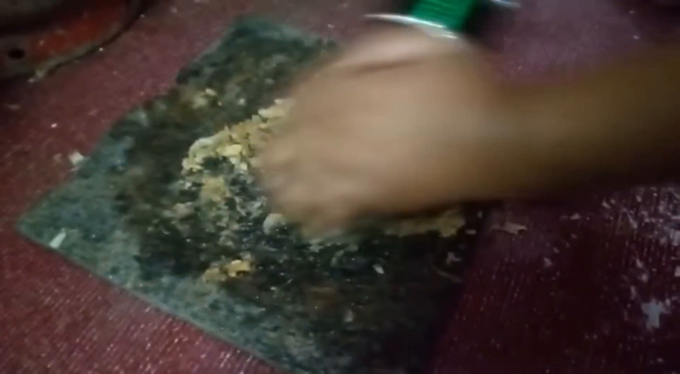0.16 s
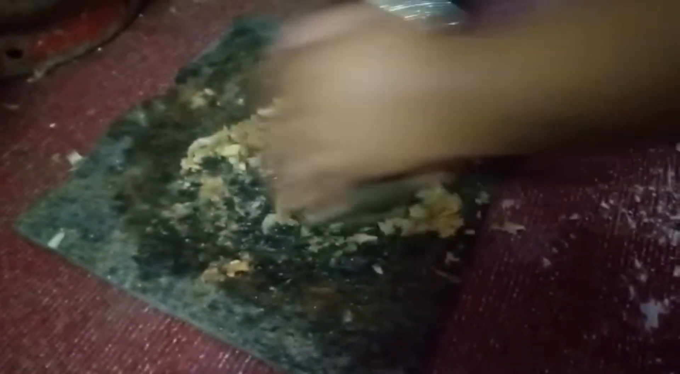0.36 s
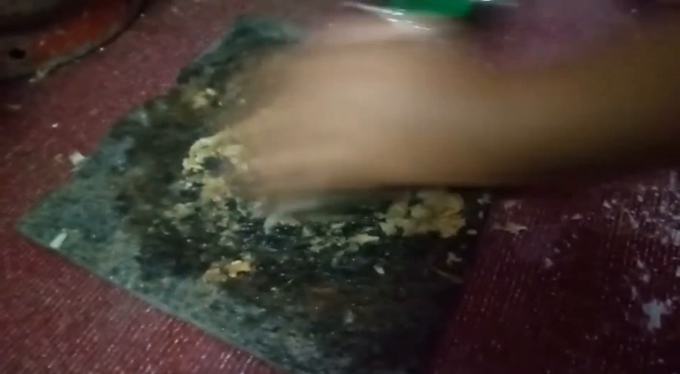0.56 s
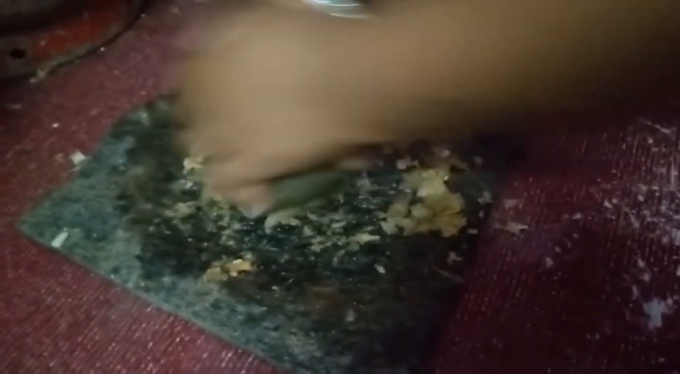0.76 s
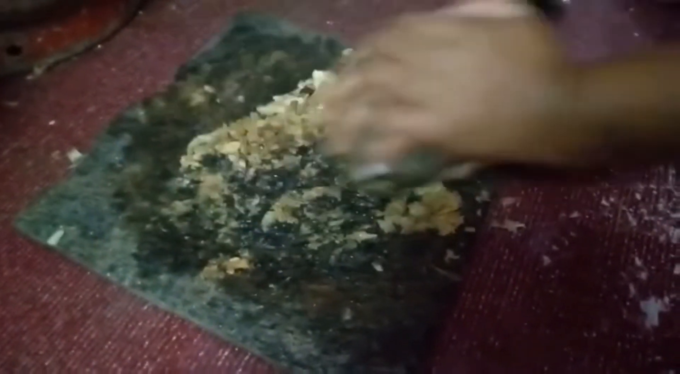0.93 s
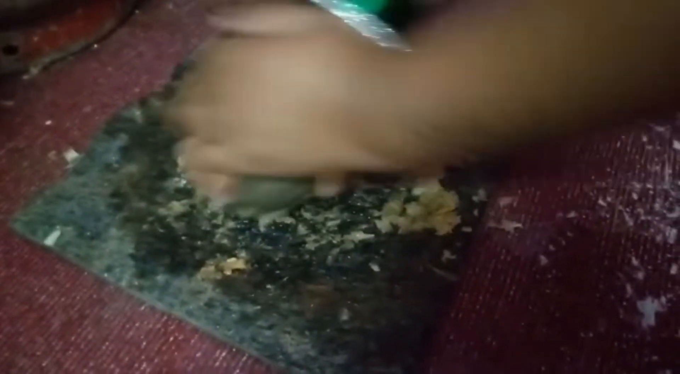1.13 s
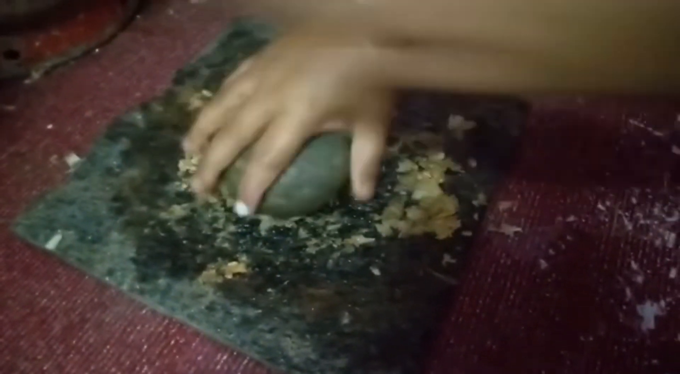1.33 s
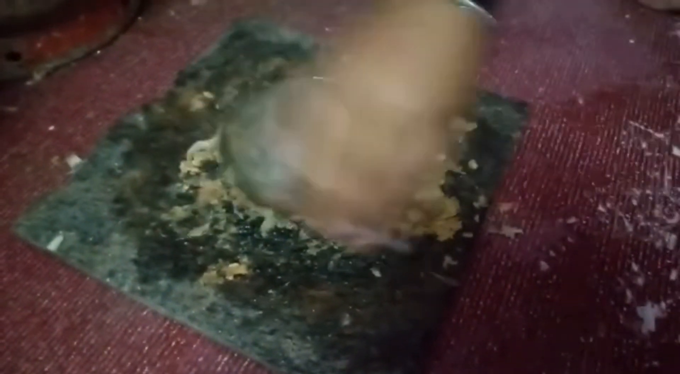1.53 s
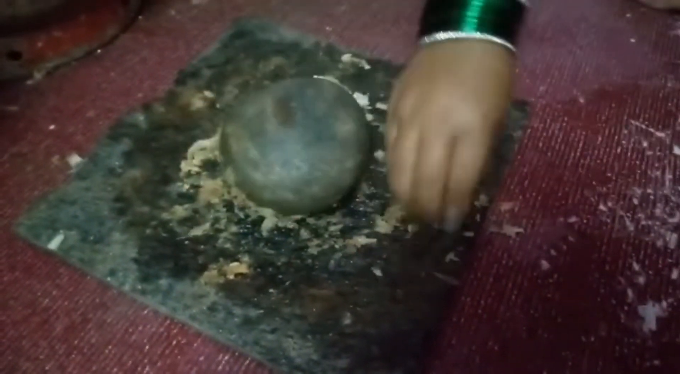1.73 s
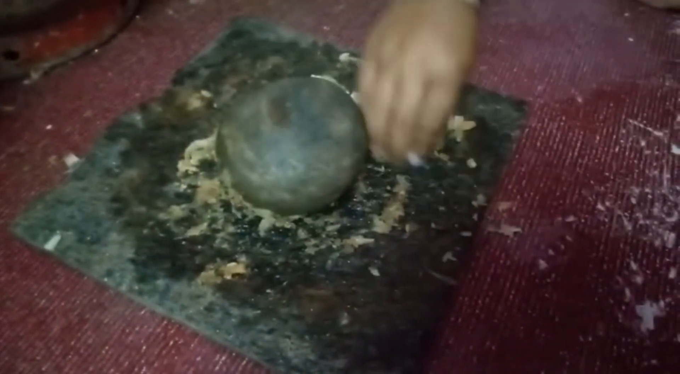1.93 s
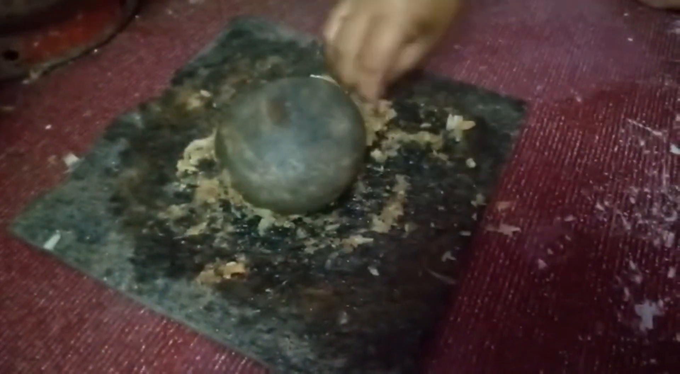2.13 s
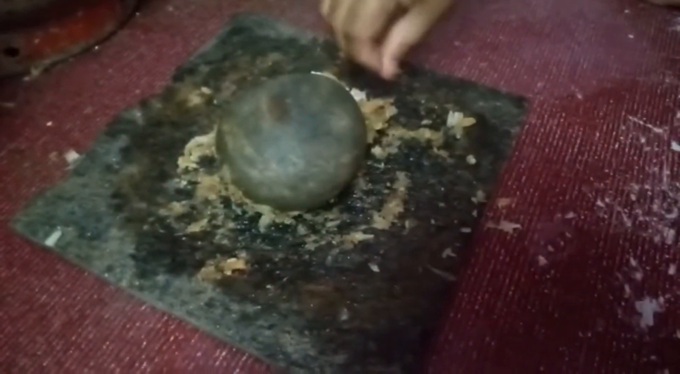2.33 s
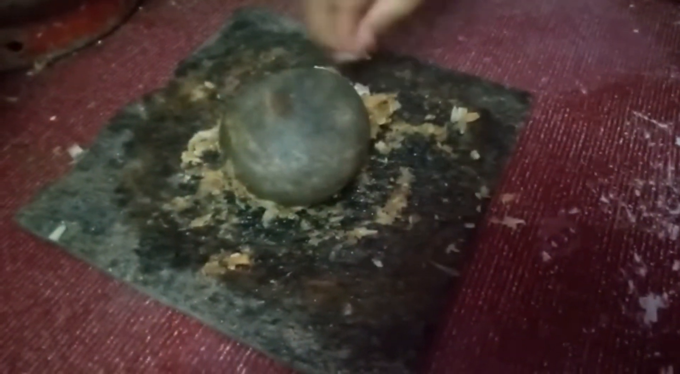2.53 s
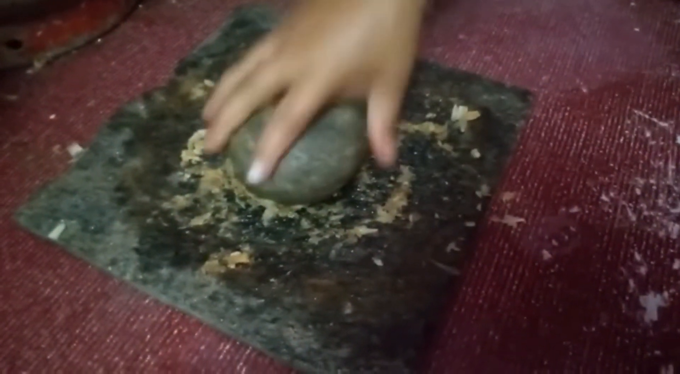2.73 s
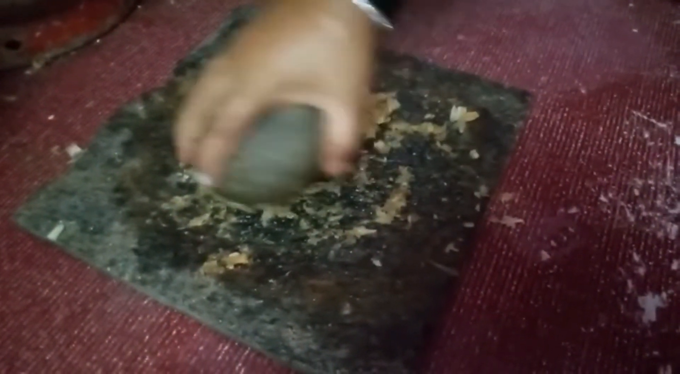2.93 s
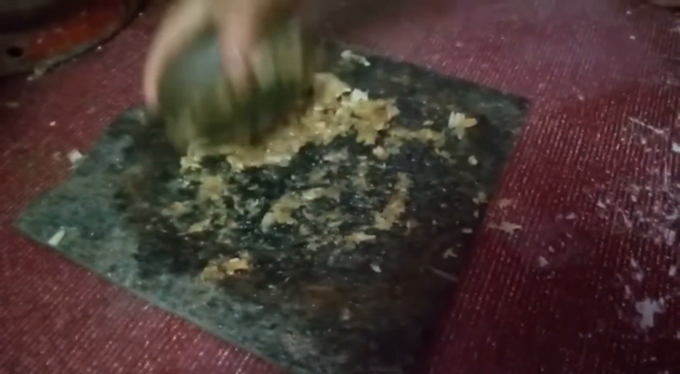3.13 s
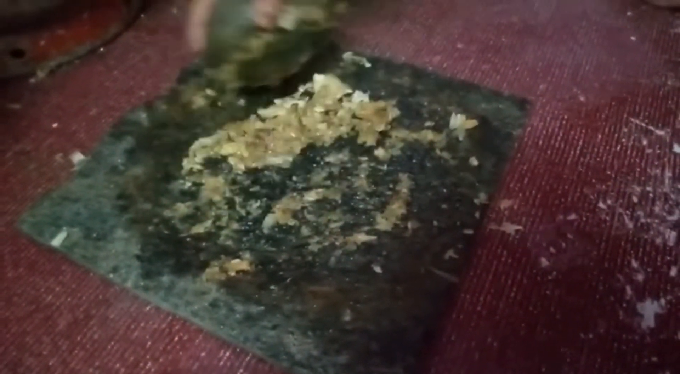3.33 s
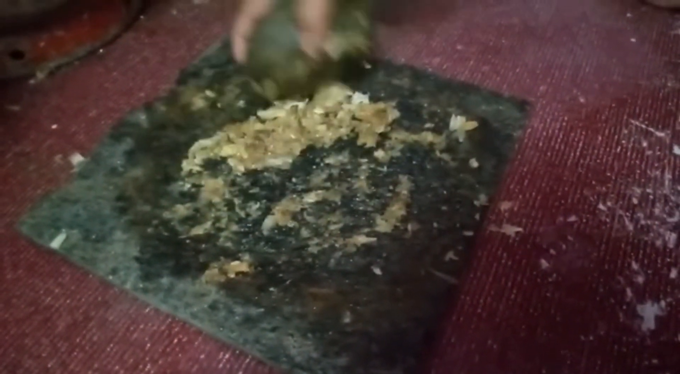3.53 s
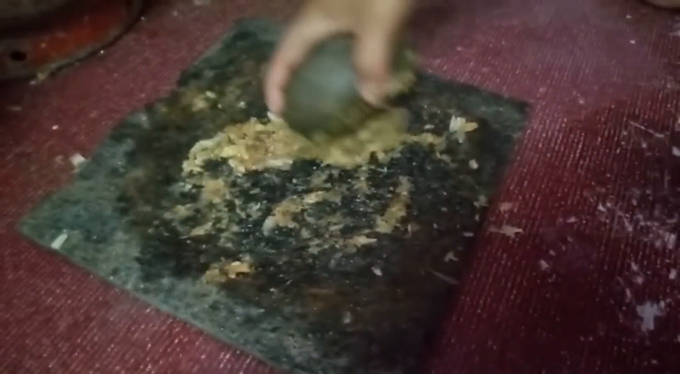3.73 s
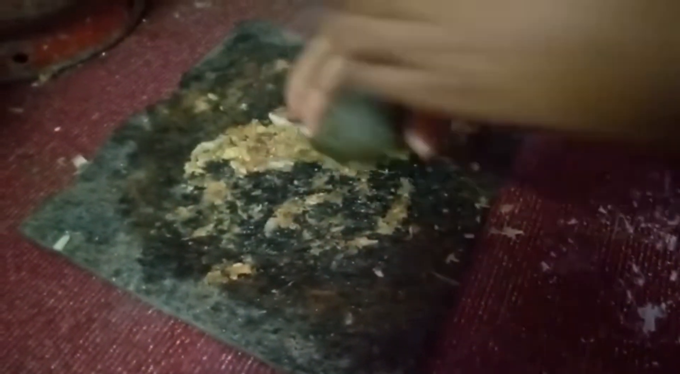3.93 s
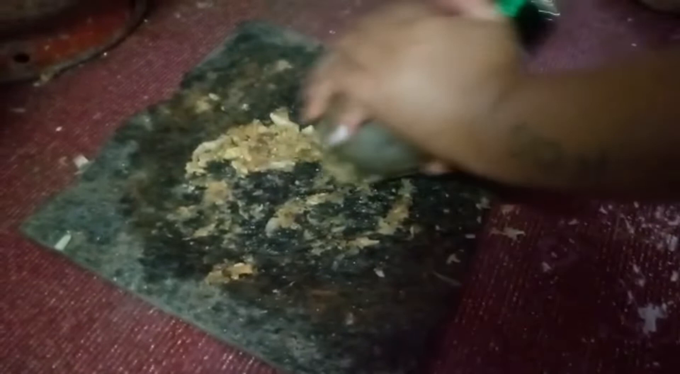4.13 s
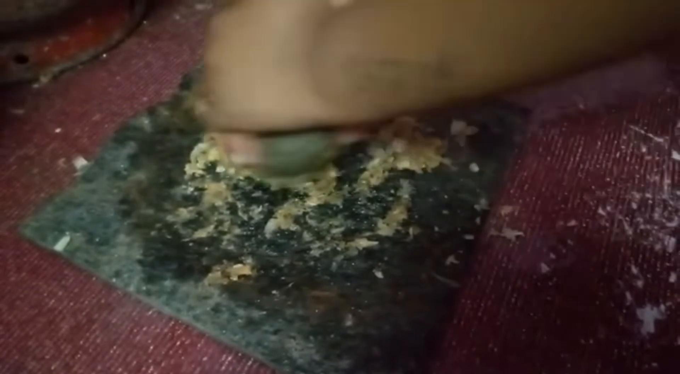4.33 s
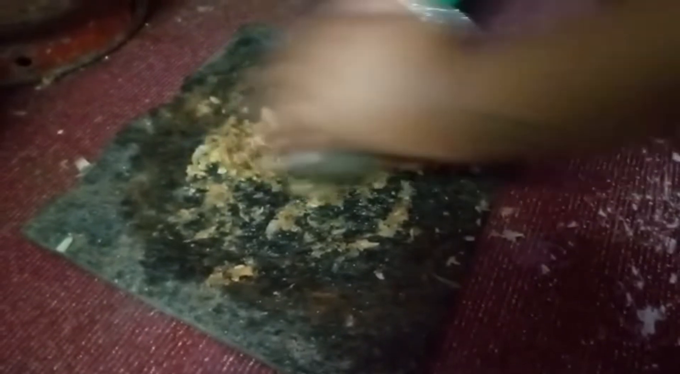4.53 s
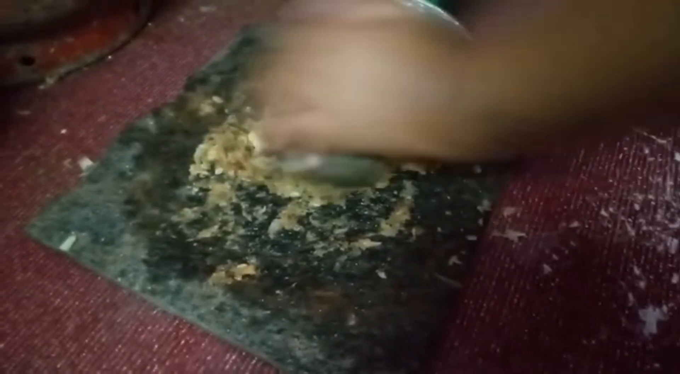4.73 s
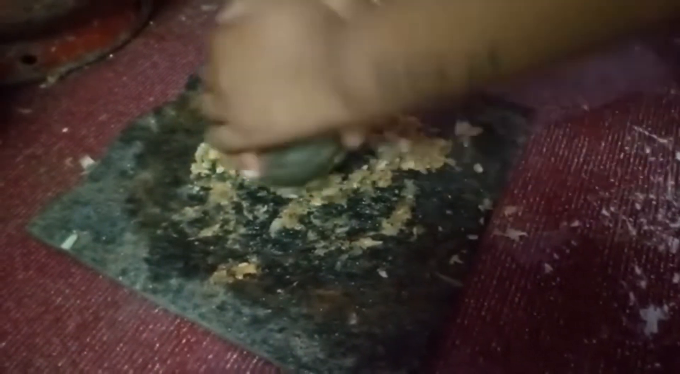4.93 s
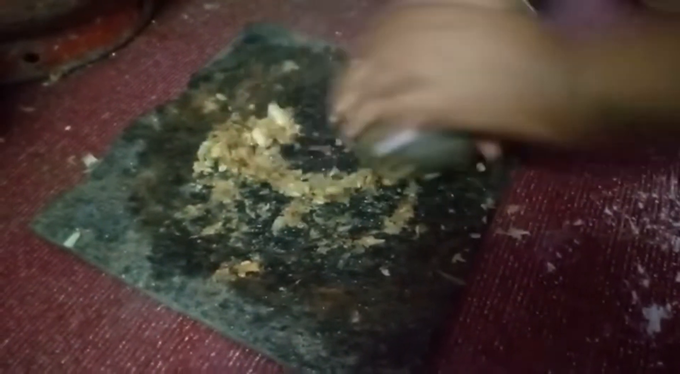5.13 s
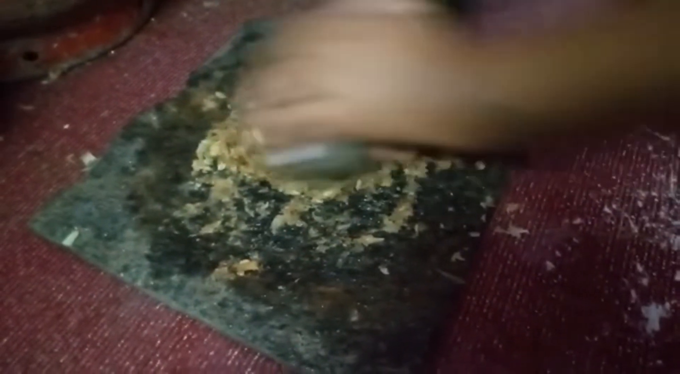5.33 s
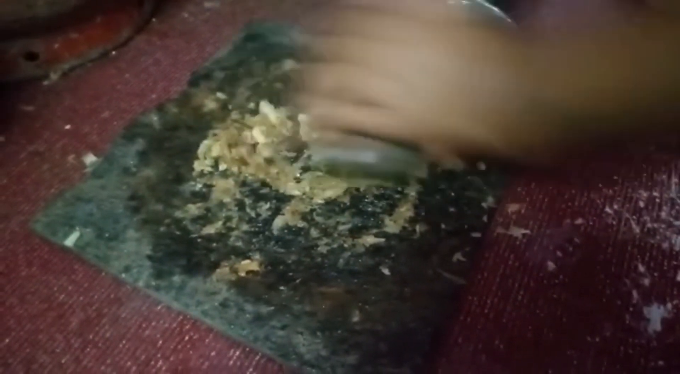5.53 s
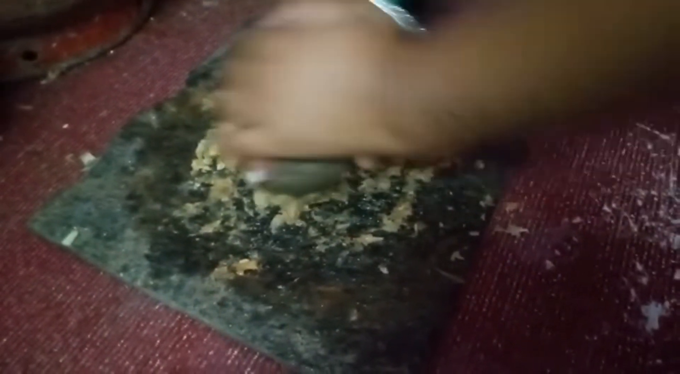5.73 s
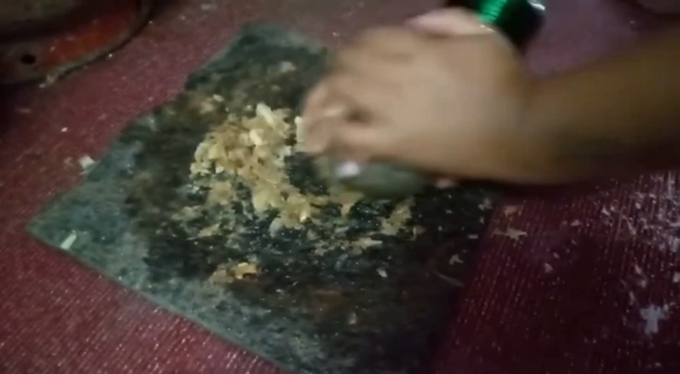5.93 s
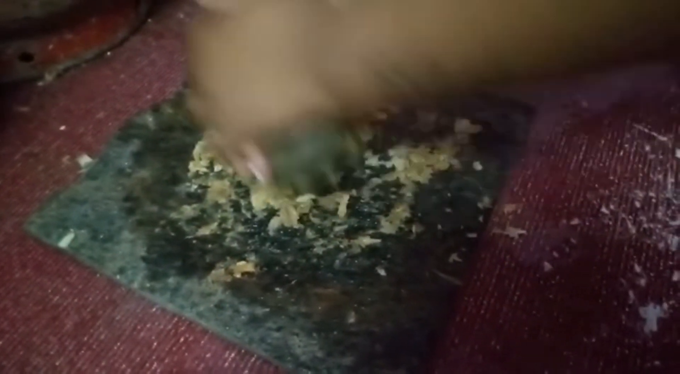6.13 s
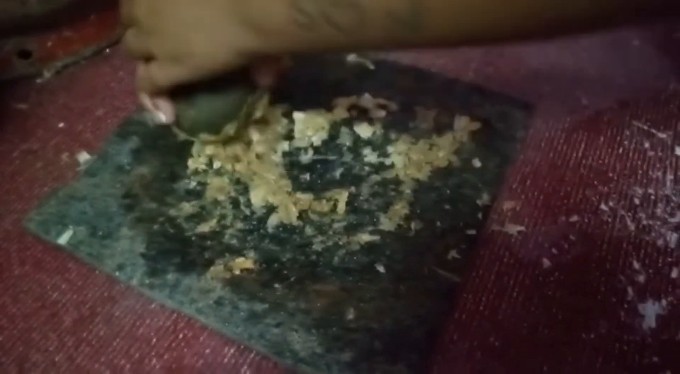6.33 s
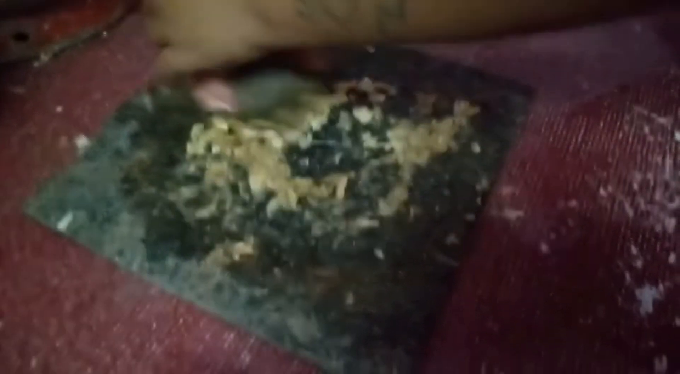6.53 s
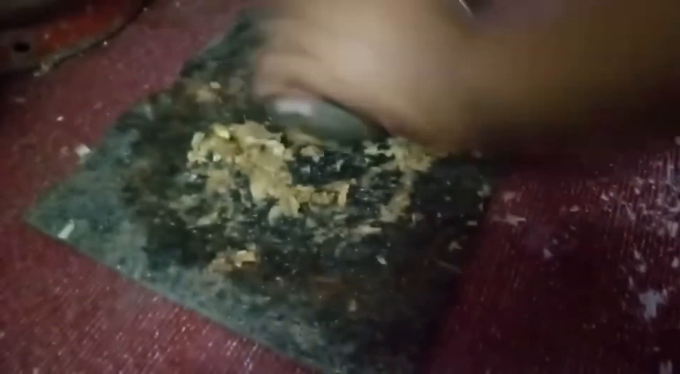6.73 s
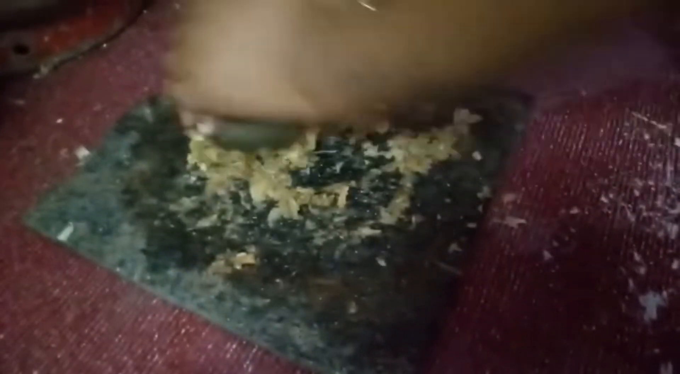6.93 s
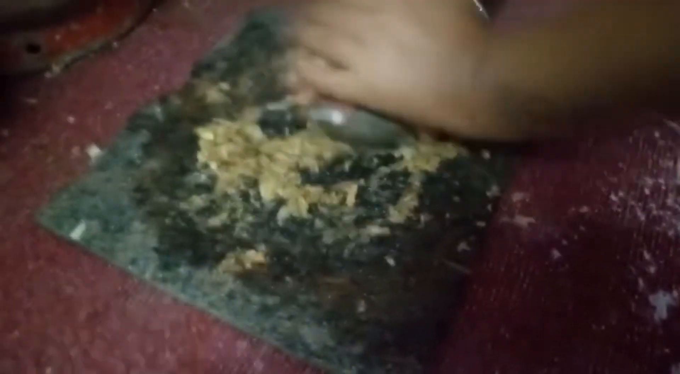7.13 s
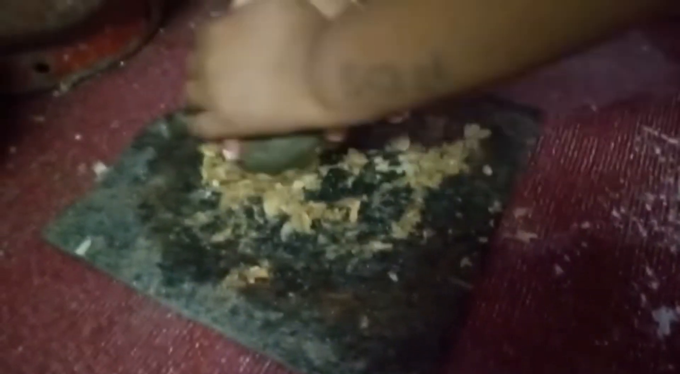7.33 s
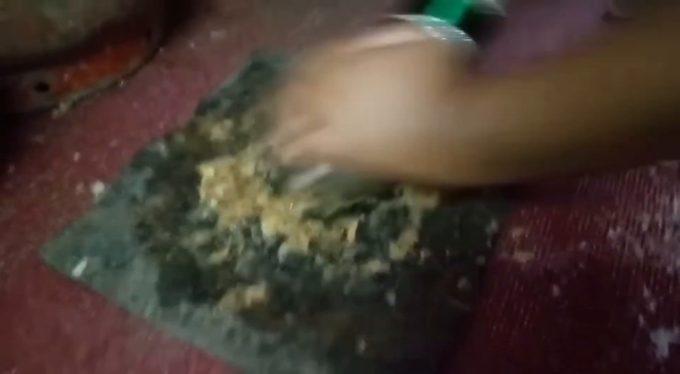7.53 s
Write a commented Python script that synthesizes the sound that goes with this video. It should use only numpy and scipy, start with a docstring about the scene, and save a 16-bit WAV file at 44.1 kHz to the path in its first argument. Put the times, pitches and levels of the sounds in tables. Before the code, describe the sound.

Gritty grinding of stone on stone, heard very close in a small kitchen. Quick scrapes with dull hollow clunks come first, then only light hand scuffs over soft air and low rumble. A loud, tight stone landing breaks the lull, followed by a brief rub and repeated crunchy strokes, dense with crackling grit and bright clicks, still going strongly at the end. Reflections are short and dry.

```python
"""Grit slips under a hand-held stone rocked and dragged over a thin slab, ringing the slab's modes.
Spices crunch as clumped blips, snaps and scrape noise; seed cracks and bright clicks are short pitched bursts.
The stone knocks as it lands, a short blow on the slab modes, with some dry pops; slides ring the stone itself.
The floor thrums as noise in one drifting resonance. Behind: kitchen air, hiss and a low wavering rumble.
A small microphone is close; a short dull tail of random reflections gives the room."""
import sys
import numpy as np
from scipy import signal
from scipy.fft import next_fast_len
from scipy.io import wavfile
from scipy.ndimage import uniform_filter1d

SR = 44100
rng = np.random.default_rng(int(sys.argv[2]) if len(sys.argv) > 2 else 0)


def to_wav(sig):
    """Store sig (one row per channel, or 1-D mono) as 16-bit WAV at the path in sys.argv[1].

    Samples outside -1..1 are clipped; the rate is SR.
    """
    pcm = np.clip(np.atleast_2d(sig), -1, 1) * 32767
    pcm = np.round(pcm).astype(np.int16)
    wavfile.write(sys.argv[1], SR, pcm.T)  # frames by channels


N = 333837  # samples

# Slab modes in four groups: bass, low, middle, high. Each row: frequency in Hz, relative level in dB,
# 60 dB decay in s.
SLAB_MODES = [
    [(146, -6, 0.062), (238, 2, 0.032), (286.3, 4, 0.038), (382, -1, 0.068), (446, 7.5, 0.03)],
    [(599.4, -3.5, 0.063), (764, 12.5, 0.014), (860, 6, 0.012), (1170, -10.5, 0.014)],
    [(1402, 9, 0.013), (1592, 4, 0.017), (1693, -2.5, 0.014)],
    [(2074, 6, 0.017), (1900, -10.5, 0.03), (2020, -2.5, 0.012), (3450, -11, 0.01), (2730, -5.5, 0.0069)],
]
# Pull of the contact spot on the slab tuning. Each row: time in s, strongest middle mode in Hz,
# strongest high mode in Hz.
SPOT_TUNING = [(0.1, 1336, 2050), (.22, 1479, 2120), (.86, 1367, 2050), (.97, 1335, 2050),
               (1.07, 1480, 2090), (3.48, 1316, 2030), (3.56, 1270, 2090), (3.62, 1371, 2170),
               (4.3, 1471, 2140), (6.44, 1400, 1985), (7.1, 1435, 2080)]
# Bare stone drags. Each row: start in s, hold in s, level of the low modes in dB,
# then bass, middle and high modes relative to the low modes in dB.
DRAGS = [(0.0, 0.092, -35, -3.5, 7, 4), (0.19, 0.045, -26.5, -7, 0, 1),
         (0.281, 0.0049, -27.5, -6.5, -1.5, 1), (0.495, 0.015, -44.5, 2, 2, 4.5),
         (0.574, 0.077, -32.5, -1.5, -2.5, -2), (.76, 0.11, -41.5, -4, -6, -5),
         (0.843, 0.09, -36, 1, 6.5, -8), (1.02, 0.13, -35.5, -2.5, -2, -5),
         (1.3, 0.3, -64.5, -4.5, -3, -0.5), (1.517, 0.0091, -37.5, 3.5, -10, -25),
         (1.799, 0.17, -58.5, -3.5, 1.5, -1), (2.858, 0.062, -72.5, 3.5, 8, 3),
         (3.485, 0.041, -31.5, -1, 2.5, -11), (3.59, 0.064, -41, -1.5, 0, 9.5),
         (3.664, 0.0082, -34.5, -4, 2.5, 10), (3.743, 0.043, -40, 2.5, 2, 3.5),
         (4.0, 0.24, -68, 1.5, -2, 1), (4.227, 0.039, -37.5, -9, 4.5, -2), (4.42, 0.23, -58.5, -6, 11.5, 4),
         (4.62, 0.012, -38.5, -2.5, 1.5, -4), (4.801, 0.068, -51, -3, 7.5, -6),
         (4.898, 0.005, -36.5, -6, 2, -2), (5.241, 0.14, -51, -8, -7, -1), (5.348, 0.007, -29.5, -8, 3, -6),
         (5.42, 0.13, -46.5, -16, -10, -23), (5.65, 0.098, -45.5, -16, -2.5, -9),
         (5.747, 0.0034, -32, -2, 2, -1), (5.96, 0.013, -43, -6.5, -4.5, -5),
         (6.064, 0.0026, -34, -8.5, 2, 3), (6.2, 0.16, -53.5, -4, -22, -1), (6.449, 0.07, -28, -6.5, -2, 7),
         (6.54, 0.08, -34.5, -1.5, -8, -3), (6.9, 0.084, -50, -4.5, 5.5, 2),
         (7.076, 0.022, -35.5, 3, 7, -1), (7.15, 0.047, -44.5, 3, -3, 1), (7.3, 0.025, -43.5, 4, 6, -2),
         (7.51, 0.077, -53.5, 3.5, 11.5, 5.5)]
# 20 dB fade after a drag in ms, one value per mode group.
DRAG_FADE_MS = [122.3, 110, 99, 91]
# Pushes that crush spice, and a few light hand scuffs. Each row: peak time in s, 20 dB fade in ms,
# coarse crunch in dB, fine fizz in dB.
PUSHES = [(.05, 178, -43.5, -45.5), (0.168, 118, -37.5, -35), (0.222, 97, -29, -39), (0.286, 62, -43, -31),
          (0.443, 72, -33, -32.5), (0.52, 43, -27, -21.5), (0.598, 47, -30.5, -25), (0.652, 79, -25, -26),
          (0.933, 108, -42, -38), (0.99, 38, -29, -24.5), (1.062, 95, -32, -30.5),
          (1.136, 93.5, -31, -26.5), (1.33, 159.5, -50.5, -54), (1.461, 99.5, -49.5, -63),
          (1.61, 211, -45, -41.5), (1.83, 164, -49, -43), (1.95, 153, -51.5, -45), (2.306, 31.5, -61, -51),
          (2.86, 63, -57, -64), (2.93, 92, -53.5, -50.5), (3.05, 103, -64, -53.5), (3.64, 74.5, -42, -44.5),
          (3.7, 112, -43, -42), (3.79, 134, -40.5, -40), (4.021, 102.5, -42, -44.5),
          (4.16, 86.5, -35.5, -39.5), (4.242, 125, -26.5, -30.5), (4.32, 61, -32.5, -36.5),
          (4.413, 68, -28, -35), (4.485, 102, -36, -34.5), (4.594, 149, -25.5, -30), (4.76, 89, -38, -39),
          (4.82, 85, -33, -34), (4.909, 94, -31, -34), (5.018, 31.5, -40, -49), (5.151, 36, -35, -35),
          (5.21, 111.5, -35, -34.5), (5.332, 76, -25.5, -30.5), (5.39, 90, -21.5, -27.5),
          (5.5, 77, -37.5, -43), (5.563, 79, -33, -33), (5.618, 43, -20.5, -24), (5.704, 89, -27.5, -30.5),
          (5.759, 82, -26, -31.5), (5.87, 66, -34.5, -36.5), (5.956, 91, -32, -32), (6.066, 99, -29, -32),
          (6.26, 169, -51, -73), (6.56, 93, -35, -41), (6.61, 79, -30.5, -40.5), (6.74, 172, -36, -40),
          (6.84, 100, -36, -38), (6.914, 109, -25, -32), (6.98, 39, -28.5, -30.5), (7.081, 72, -24, -32),
          (7.188, 97, -25, -29.5), (7.29, 78, -24.5, -29.5), (7.328, 58, -21, -25), (7.459, 63, -27, -33.5),
          (7.501, 43, -22.5, -23.5), (7.533, 54, -24.5, -26.5)]
# Spectrum of coarse breaks as the microphone colours them. Each row: frequency in Hz,
# relative density in dB per Hz.
CRUNCH_SPECTRUM = [(1410, -28), (2450, -11), (2810, -11.5), (3560, -8), (3870, -7.5), (5400, -15.5),
                   (7020, -22), (11900, -120)]
# Spectrum of fine breaks as the microphone colours them. Each row: frequency in Hz,
# relative density in dB per Hz.
FIZZ_SPECTRUM = [(3060, -23), (5200, -11), (5600, -9.5), (6460, -4.5), (7220, -8), (7740, -15),
                 (8450, -17.5), (9270, -13.5), (10100, -11), (13600, -24), (14900, -18), (15700, -30)]
# Stone or hand lifts clear. Each row: start in s, end in s, friction gain in dB.
LIFTS = [(1.74, 1.785, -7), (3.915, 3.955, -9), (5.055, 5.115, -8), (5.82, 5.852, -6)]
# Floor resonance under the slab. Each row: time in s, level in dB, centre in Hz.
THRUM = [(0.0, -35.5, 164.5), (.3, -72, 170), (.52, -45.5, 150.5), (.9, -42, 165), (1.24, -39, 160.8),
         (1.4, -66, 148.7), (3.42, -76.5, 161), (3.52, -37, 169), (3.85, -65, 190.3), (4.62, -55.5, 164.1),
         (6.4, -63.5, 151.6), (6.5, -36.5, 178.5), (6.9, -62, 150.5), (7.57, -47, 147.5)]
# Spectrum of air and microphone hiss. Each row: frequency in Hz, relative density in dB per Hz.
AIR_SPECTRUM = [(20, -34), (75, -13), (102, -18.5), (144, -11.5), (184, -13.5), (380, -17), (1680, -26),
                (6630, -33.5), (8450, -47.5), (15700, -33)]
# Low rumble. Each row: time in s, level in dB.
RUMBLE = [(0.0, -48), (1.22, -58), (1.9, -68), (2.8, -65), (3.58, -65), (4.36, -55), (4.78, -61),
          (6.39, -48.5), (7.04, -64), (7.21, -50), (7.57, -44)]
# Slides, light or under a stroke, that ring the hand stone. Each row: start in s, hold in s, level in dB,
# extra of the stone's first mode in dB.
SLIDES = [(0.188, 0.097, -40, 9), (0.593, 0.051, -53.5, 19), (3.488, 0.15, -68, 16.5),
          (3.64, 0.14, -45.5, 7), (6.168, 0.13, -43, -14), (6.31, 0.12, -58.5, -7),
          (6.557, 0.037, -42.5, 10)]
# Hand stone modes. Each row: frequency in Hz, relative level in dB, 60 dB decay in s.
STONE_MODES = [(3470, 0, 0.02), (2690, 1, 0.039), (2900, 0, 0.024), (4240, 1.5, 0.025), (4780, -12, .025),
               (3670, -3.5, .025), (2260, -7, .04), (3300, 9.5, .003)]
# Stone landings, and dry pops that hardly ring. Each row: time in s, peak in dB,
# low, middle and high mode shares at that spot in dB, free ringing (decay constant) in ms.
KNOCKS = [(.1905, -19, 0, 3, 8, 12), (.226, -10, 9, -10, 3, 10), (0.5691, -9.5, 23, 20, 22.5, 45),
          (0.839, 3, -15.5, 8, -0.5, 9.1), (0.993, -12, 22, -29, 9, 8.4), (1.0625, -14.5, 5, 1, 4, 39),
          (1.515, -19.5, 5, -8, -17, 12), (3.4821, 1, 2.5, 6.5, 1.5, 7.6), (3.4846, 0, -2, -19, 12.5, 21.3),
          (4.224, -7.5, -6.5, -15, 7, 8.2), (5.344, -13.5, 2.5, -1, -5, 19), (6.448, 2.5, 3, 5.5, 9, 7.8),
          (6.6009, -6, -9, -9, 16, 0.22), (6.6137, -1, 23.5, 17, 19.5, 0.14), (6.634, 0, 7, -14, 6.5, 0.2),
          (7.085, -15.5, -12, 21, 25, 14), (7.197, -2.5, 21, -1, 9, 0.23)]
# Seed cracks, and the bright clicks of knocks and pops. Each row: time in s, peak in dB,
# pitch in Hz, length in ms.
CRACKS = [ (0.628, -11, 3600, 1.4), (0.992, -13, 5500, 1.5), (1.096, -18, 3980, 2),
          (1.279, -23.5, 6860, 0.78), (1.305, -31, 7100, 1.1), (1.322, -32, 4520, 4),
          (1.396, -34, 6400, 1.6), (1.474, -34.5, 4000, 2.5), (1.5932, -25, 6600, 0.64),
          (1.789, -35, 8920, 2.5), (1.943, -31.5, 7100, 1.5), (2.05, -39.5, 6860, 1.3),
          (2.303, -41, 4430, 4.5), (2.845, -41.5, 6400, 3.7), (2.9, -40, 7000, 5.6),
          (2.918, -31.5, 6500, 0.93), (2.94, -28, 6980, 2.6), (3.035, -49.5, 6160, 2.2),
          (3.0569, -36, 12130, 1.5), (3.397, -38.5, 7400, 1.8), (3.483, -24, 3350, 1.5),
          (4.032, -26, 5960, 1.4), (4.2263, -11.5, 3440, 3.1), (4.2458, -10, 3780, 0.9),
          (4.2513, -8, 3830, 2.3), (4.3974, -13, 3960, 1.2), (4.5389, -13.5, 3470, 2.7),
          (4.575, -16, 6340, 3.9), (4.603, -7.5, 4160, 0.99), (4.754, -20, 4630, 1.0),
          (4.825, -14.5, 4170, 1.1), (4.998, -25, 6180, 2.1), (5.306, -16, 4060, 5.7),
          (5.322, -11, 6300, 4.5), (5.3746, -6.5, 6140, 1.4), (5.4034, -4, 4060, 6),
          (5.4304, -5, 4080, 0.16), (5.578, -13, 3690, 3.4), (5.612, -10, 6400, 1.8),
          (5.629, -7.5, 6580, 1.3), (5.853, -30, 4020, 3.9), (5.8683, -16, 3300, 4.5),
          (5.9475, -14, 6600, 2.1), (6.009, -9.5, 6620, 4), (6.4466, -14, 3210, 6.7),
          (6.5663, -5, 7130, 0.21), (6.6144, -11, 3070, 0.6), (6.634, -16, 3320, 0.7),
          (6.691, -22.5, 4400, 1.8), (6.758, -20, 3300, 1.9), (6.794, -19, 4240, 2.7),
          (6.8717, -5, 7060, 1.55), (6.8976, -11, 6540, 0.75), (6.906, -5.5, 3210, 9.3),
          (6.9585, -11.5, 3840, 0.94), (7.195, -5, 6600, 2.56), (7.3257, -7.5, 3480, 0.71),
          (7.497, -10, 3460, 1.3), (7.526, -8, 6500, 2.4), (7.5586, -12.5, 4240, 3.4)]

DRAG_RISE_MS, LANDING_RISE_MS = 90, 11  # for 20 dB
SLAB_REST_DB, CRUSH_REST_DB, AIR_DB = -87.5, -78.5, -66
SWELL_SHARE = 0.75  # push rise time / fade time
FADE_EXPONENT = 0.88  # below 1: dB fall per ms slows during the fade
ROOM_DB, EDGE_HZ = -21.0, 16700


def amp(db):
    """Amplitude ratio from dB."""
    return 10 ** (np.asarray(db) / 20)


def evened(x):
    """Scale to RMS 1."""
    return x / np.sqrt(np.mean(x ** 2) + 1e-20)


def curve(rows, column):
    """Interpolate a table column to every sample."""
    rows = np.asarray(rows)
    return np.interp(np.arange(N) / SR, rows[:, 0], rows[:, column])


def add(mix, start_s, sound):
    """Mix an event in at its start time."""
    part = mix[round(start_s * SR):][:len(sound)]
    part += sound[:len(part)]


def coloured(x, points):
    """Minimum-phase filter with the given spectrum."""
    hz, db = np.transpose(points)
    bins_hz = np.abs(np.fft.fftfreq(8192, 1 / SR))
    gain_db = np.interp(np.log(bins_hz + 1), np.log(hz), db, -100, -100)
    log_gain = gain_db * np.log(10) / 20
    taps = np.fft.ifft(np.exp(np.conj(signal.hilbert(log_gain)))).real[:4096]
    return signal.oaconvolve(x, taps)[:len(x)]


def ring(modes, shift_hz=0):
    """Impulse response of a mode group: decaying sines, energy 1."""
    t = np.arange(SR // 6) / SR
    x = sum(amp(db - 60 * t / t60_s) * np.sin(2 * np.pi * (hz + shift_hz) * t)
            for hz, db, t60_s in modes)
    return x / np.linalg.norm(x)


def grit(per_s, spread_db, clump_db, clump_ms):
    """Random slips of uneven size that come in clumps."""
    size = amp(spread_db * np.minimum(rng.exponential(1, N), 4.5)) * rng.standard_normal(N)
    width = max(round(clump_ms * SR / 1000), 2)
    smooth = uniform_filter1d(rng.standard_normal(N), width)
    clumps = evened(uniform_filter1d(smooth, width))
    slips = rng.random(N) < per_s / SR
    return evened(size * slips * amp(clump_db * clumps))


def swell(start_s, hold_s, rise_ms, fade_ms):
    """Power of one gesture every ms: rise, hold, fade (times for 20 dB)."""
    ms = np.arange(0, N / SR * 1000) - start_s * 1000
    rise = np.maximum(-ms, 0) / rise_ms
    fade = (np.maximum(ms - hold_s * 1000, 0) / fade_ms) ** FADE_EXPONENT
    return amp(-2 * 20 * (rise + fade))


def gains(power):
    """Rows of power every ms to amplitude gains every sample."""
    t = np.arange(N) / SR
    return [np.interp(t, np.arange(len(p)) / 1000, np.sqrt(p)) for p in power]


def detune():
    """Shift of each mode group in Hz: contact spot retunes the middle and high groups."""
    middle_hz = curve(SPOT_TUNING, 1) - SLAB_MODES[2][0][0]
    high_hz = curve(SPOT_TUNING, 2) - SLAB_MODES[3][0][0]
    return [np.zeros(N), np.zeros(N), middle_hz, high_hz]


def drag_gains():
    """Gain of each mode group; a drag that begins with a landing rises fast."""
    power, fade_ms = amp(2 * SLAB_REST_DB), np.array(DRAG_FADE_MS)[:, None]
    for start_s, hold_s, db, bass_db, middle_db, high_db in DRAGS:
        landed = min(abs(start_s - knock[0]) for knock in KNOCKS) < .012
        rise_ms = LANDING_RISE_MS if landed else DRAG_RISE_MS
        group_db = db + np.array([[bass_db], [0], [middle_db], [high_db]])
        power = power + amp(group_db) ** 2 * swell(start_s, max(hold_s, 0), rise_ms, fade_ms)
    return gains(power)


def slab_drag():
    """Grit under the stone drives every mode group, as strongly as the contact spot allows."""
    shared = grit(per_s=3000, spread_db=2.5, clump_db=3.8, clump_ms=9)
    t, touch_db = np.arange(N) / SR, np.zeros(N)
    for s, db, *_, ms in KNOCKS:  # stone hops clear just before a strong ringing landing
        approach = (t < s) * np.clip(1 + (t - s) / 0.12, 0, 1)
        touch_db -= 14 * (ms > 2) * (db > -5) * approach
    cushion = 1 - np.exp(-np.arange(SR // 6) / SR / 0.0061)  # crushed paste softens each slip
    lead = 2000  # samples; drag is already under way at the start
    out = np.zeros(N)
    for modes, gain, shift_hz in zip(SLAB_MODES, drag_gains(), detune()):
        drive = evened(shared + 0.6 * rng.standard_normal(N)) * gain * amp(touch_db)
        drive = np.r_[drive[lead:0:-1], drive]
        soft = ring(modes) * cushion
        rung = signal.oaconvolve(drive, soft / np.linalg.norm(soft))[lead:lead + N]
        if shift_hz.any():
            analytic = signal.hilbert(rung, next_fast_len(N))[:N]
            rung = (analytic * np.exp(2j * np.pi * np.cumsum(shift_hz) / SR)).real
        out += rung
    return out


def blips(low_hz, high_hz):
    """Dense small breaks of seed and husk, each a short dry blip at one of 12 pitches."""
    t, pitches_hz = np.arange(512) / SR, np.geomspace(low_hz, high_hz, num=12)
    shape = np.exp(-t / 0.001) * (1 - np.exp(-t / 0.0001))
    breaks = grit(per_s=2200, spread_db=2.8, clump_db=3.5, clump_ms=12)
    piece = rng.integers(0, len(pitches_hz), N)
    out = np.zeros(N)
    for k, hz in enumerate(pitches_hz):
        blip = shape * np.sin(2 * np.pi * hz * t)
        out += signal.oaconvolve(breaks * (piece == k), blip)[:N]
    return evened(out)


def push_gains():
    """Gains of crunch and fizz: each push swells and fades."""
    power = amp(2 * CRUSH_REST_DB)
    for peak_s, fade_ms, crunch_db, fizz_db in PUSHES:
        fade_ms = max(fade_ms, 10)
        gesture = swell(peak_s, 0, SWELL_SHARE * fade_ms, fade_ms)
        power = power + np.outer(amp([crunch_db, fizz_db]) ** 2, gesture)
    return gains(power)


def crunch():
    """Coarse and fine breaks: blips, snaps partly shared by both layers, and a smooth scrape."""
    snaps, splinters = (grit(per_s=3000, spread_db=2.2, clump_db=3.0, clump_ms=8) for _ in range(2))
    body = .6 * blips(3000, 4700) + .9 * snaps + .35 * rng.standard_normal(N)
    fizz = 1.1 * blips(5700, 7600) + 1.8 * snaps + 2.5 * splinters + 0.31 * rng.standard_normal(N)
    coarse_gain, fine_gain = push_gains()
    coarse = evened(coloured(body, CRUNCH_SPECTRUM)) * coarse_gain
    return coarse + evened(coloured(fizz, FIZZ_SPECTRUM)) * fine_gain


def thrum():
    """Noise in one low resonance that drifts as the weight shifts."""
    slow = signal.lfilter(*signal.butter(2, 18, fs=SR), rng.standard_normal((2, N)))
    phase = 2 * np.pi * np.cumsum(curve(THRUM, 2)) / SR
    tone = slow[0] * np.cos(phase) + slow[1] * np.sin(phase)
    return evened(tone) * amp(curve(THRUM, 1))


def kitchen():
    """Steady air and microphone hiss, and a low rumble that wavers."""
    air = amp(AIR_DB) * evened(coloured(rng.standard_normal(N), AIR_SPECTRUM))
    band = signal.butter(2, [62, 95], "band", fs=SR, output="sos")
    low = signal.sosfilt(band, rng.standard_normal(N))
    return air + evened(low) * amp(curve(RUMBLE, 1))


def slides():
    """Smooth fine friction rings the hand stone; the grip frees or damps its first mode."""
    power = 0
    for start_s, hold_s, db, first_db in SLIDES:
        gesture = swell(start_s, max(hold_s, 0), 34.6, 66)
        power = power + np.outer(amp([db + first_db, db]) ** 2, gesture)
    rub = rng.standard_normal(N)
    groups = STONE_MODES[:1], STONE_MODES[1:]
    return sum(signal.oaconvolve(rub * gain, ring(modes))[:N] for gain, modes in zip(gains(power), groups))


def knocks():
    """A short blow rings the slab modes, soon damped by the pressing stone; dry pops hardly ring."""
    out, t = np.zeros(N), np.arange(SR // 6) / SR
    blow, shifts_hz = signal.windows.hann(8), detune()
    for s, db, low_db, middle_db, high_db, ms in KNOCKS:
        bass, low, middle, high = (ring(modes, shift[round(s * SR)])
                                   for modes, shift in zip(SLAB_MODES, shifts_hz))
        sound = amp(-25.5) * bass - amp(low_db) * low + amp(middle_db) * middle + amp(high_db) * high
        settle = (1 - np.exp(-t / 0.0013)) * (0.01 * ms + np.exp(-t * 1000 / ms))
        sound = np.convolve(sound * settle, blow)
        add(out, s, amp(db) * sound / np.abs(sound).max())
    return out


def cracks():
    """Each crack or click is a noise burst around its own pitch, with a wide click and a short tail."""
    out, t = np.zeros(N), np.arange(900) / SR - .001  # 1 ms of onset
    click_band = signal.butter(2, [2800, 12000], "band", fs=SR)
    for s, db, hz, ms in CRACKS:
        fall = np.exp(-t * 1200 / max(ms, .2)) + .03 * ms * np.exp(-t / 0.003)
        envelope = np.where(t < 0, np.exp(t / 0.000083), fall)
        wide = signal.lfilter(*click_band, rng.standard_normal(900))
        pitch_band = signal.butter(1, [hz * 0.93, hz * 1.013], "band", fs=SR)
        sound = envelope * (evened(signal.lfilter(*pitch_band, wide)) + 0.11 * wide)
        add(out, s - .001, amp(db) * sound / np.abs(sound).max())
    return out


def lifted():
    """Gain of all friction, which drops while the stone or hand is lifted."""
    t = np.arange(N) / SR
    drop_db = sum(db * (t > from_s) * (t < to_s) * 1. for from_s, to_s, db in LIFTS)
    return amp(uniform_filter1d(drop_db, SR // 100))


def room(x):
    """A short tail of sparse random reflections, dull in the treble."""
    at = np.arange(300, SR // 3, 22)
    taps = np.zeros(SR // 3 + 22)
    signs = rng.choice([-1., 1.], len(at))
    taps[at + rng.integers(0, 22, len(at))] = signs * amp(-60 * at / SR / 0.2)  # 60 dB in 0.2 s
    taps = signal.lfilter(*signal.butter(3, 2400, fs=SR), taps)
    return signal.oaconvolve(x, taps / np.linalg.norm(taps))[:N]


def scene():
    """Stone and spice sounds with their room tail, over kitchen and thrum."""
    friction = (slab_drag() + crunch() + slides()) * lifted()
    near = friction + knocks() + cracks()
    near = signal.lfilter(*signal.butter(3, 120, "high", fs=SR), near)  # the close microphone cuts deep bass
    return (near + amp(ROOM_DB) * room(near) + kitchen() + thrum())[None]


def record(dry):
    """Peaks beyond full scale clip; then a low-pass sets the band limit."""
    clipped = np.clip(dry, -1, 1)
    taps = signal.firwin(511, EDGE_HZ, window=("kaiser", 9), fs=SR)
    return signal.oaconvolve(clipped, taps[None], "same")


dry = scene()
out = record(dry)
to_wav(out)
```